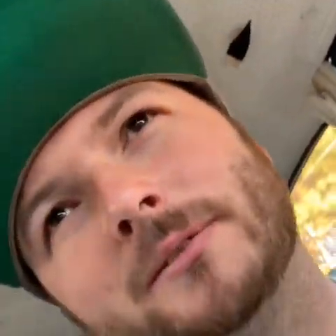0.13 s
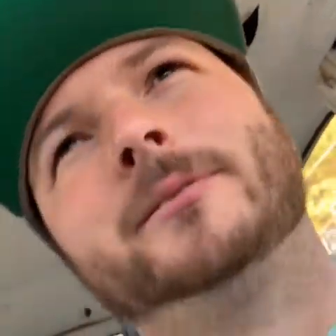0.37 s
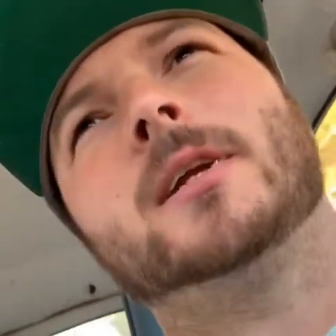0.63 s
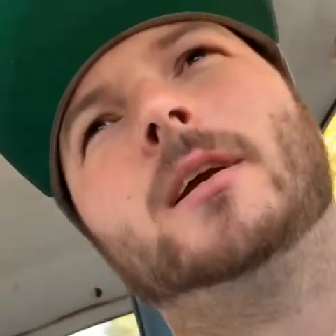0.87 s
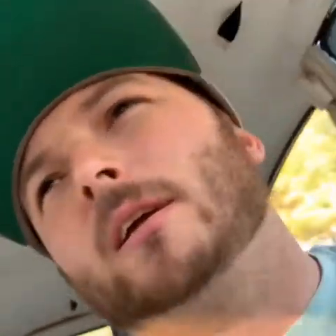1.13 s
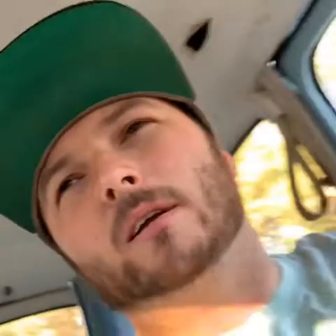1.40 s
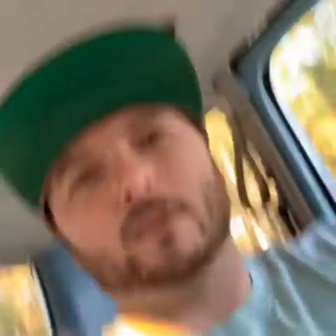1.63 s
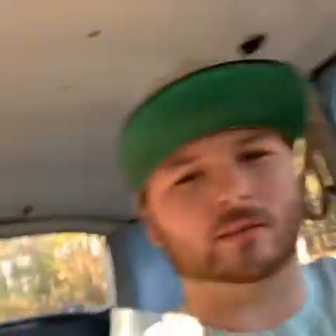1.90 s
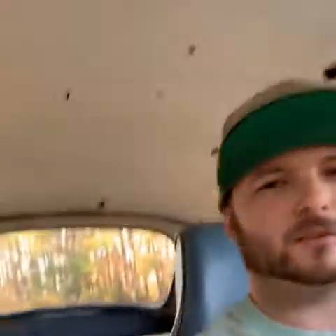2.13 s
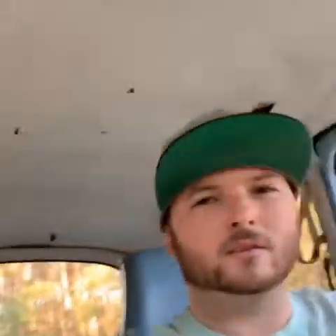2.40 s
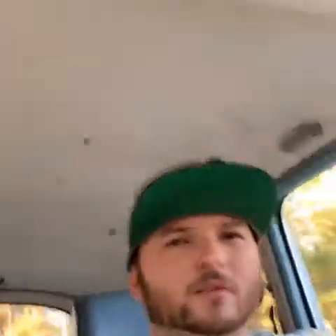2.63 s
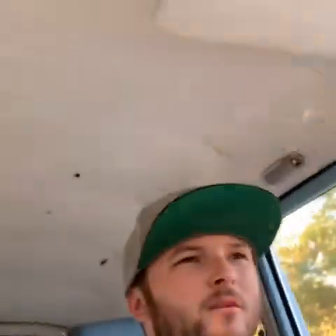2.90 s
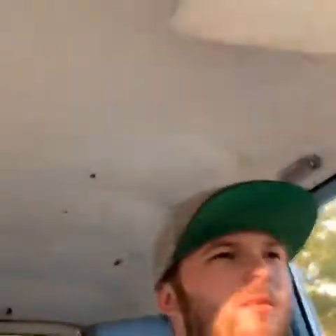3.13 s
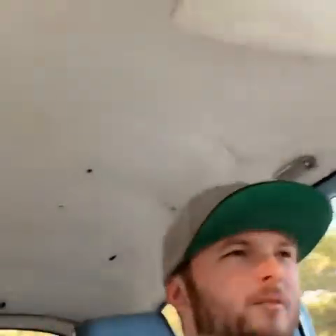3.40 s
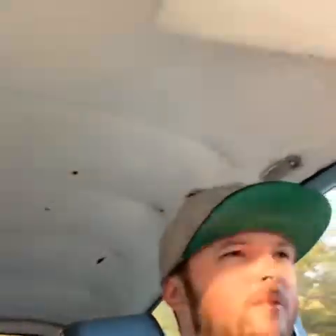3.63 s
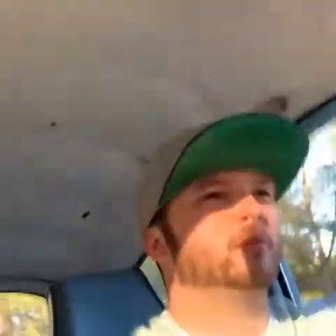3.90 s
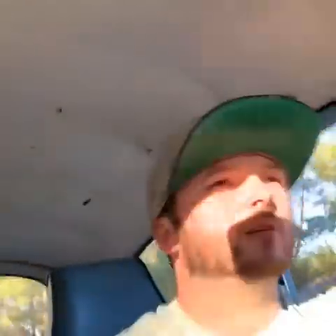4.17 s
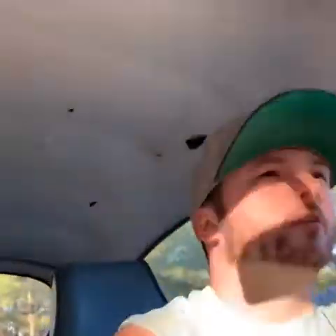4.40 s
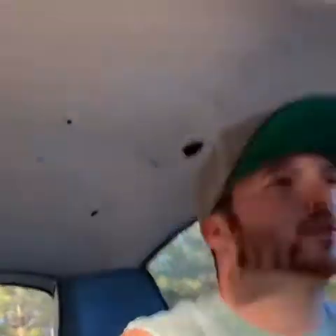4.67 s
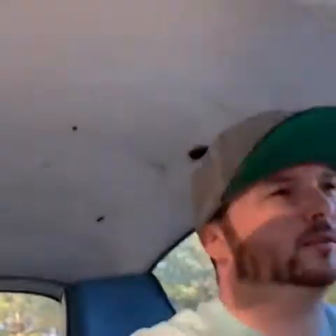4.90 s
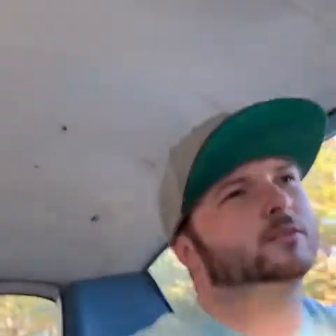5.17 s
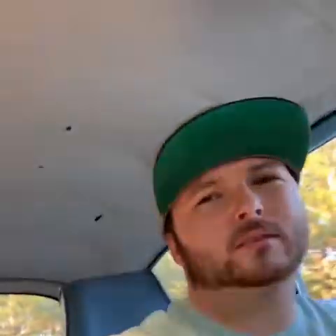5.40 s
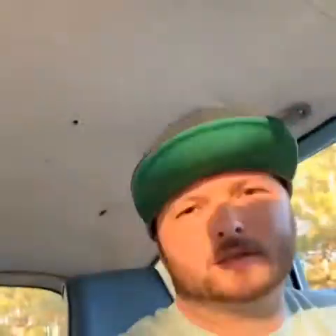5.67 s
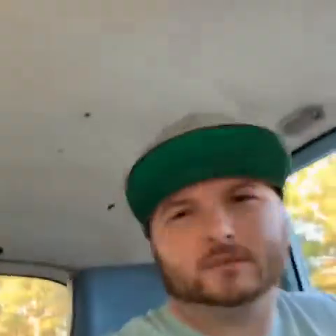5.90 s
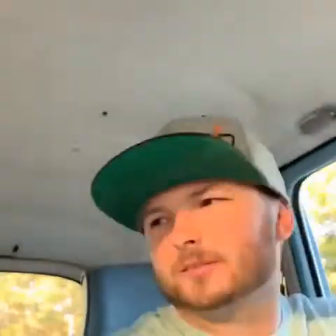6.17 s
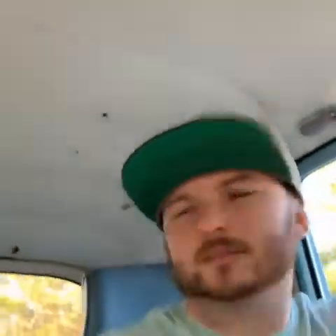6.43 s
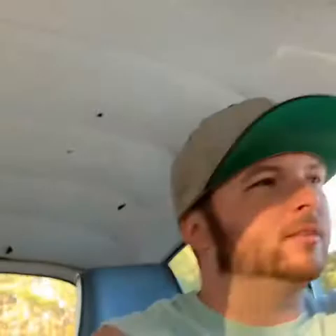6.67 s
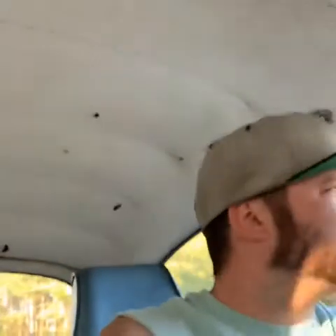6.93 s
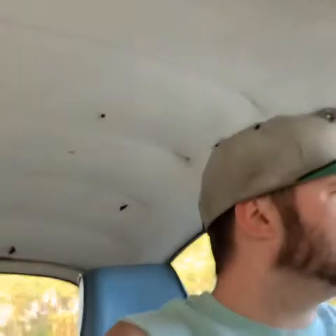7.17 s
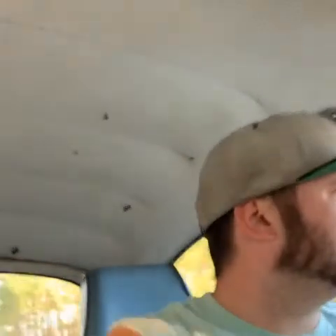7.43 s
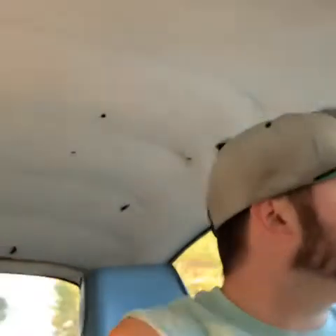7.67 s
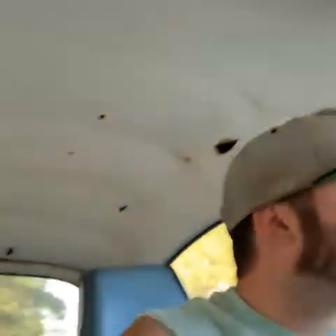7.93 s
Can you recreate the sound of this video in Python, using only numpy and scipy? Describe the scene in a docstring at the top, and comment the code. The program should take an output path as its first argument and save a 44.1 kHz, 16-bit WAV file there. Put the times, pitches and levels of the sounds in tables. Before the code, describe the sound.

A handheld phone in a car cabin picks up a low, rough engine drone sliding slowly downward, with road rumble, fan rush and soft hiss. Occasional weak knocks come first. As the phone swings away from the body the drone opens up, and a loose hard part clatters in irregular quick knocks, joined by dull floor bumps, bright clicks and brief cloth-like scuffs. The knocks fade before the end while the engine continues.

```python
"""Inside a small car on the move, a hand-held phone hears an air-cooled four-cylinder engine slow gently.
Engine orders, sines locked to the cycle, boom through cabin resonances; filtered noise gives the road
rumble, body drone, fan rush and hiss. Rough firing puffs, whines slide down and panels hum.
A loose part rings its modes as it knocks, the floor thuds, trim ticks in short damped rings, and
short noise bursts give cloth and seat scuffs, hisses and the bright noise of some knocks and ticks."""
import sys
import numpy as np
from scipy import signal
from scipy.fft import rfft, irfft, next_fast_len
from scipy.io import wavfile
from scipy.ndimage import uniform_filter1d

SR = 44100
rng = np.random.default_rng(int(sys.argv[2]) if len(sys.argv) > 2 else 0)


def voltage_ratio(decibels):
    """Convert decibels (scalar or array-like) to amplitude ratios, 20 dB per decade."""
    exponent = np.asarray(decibels, float) / 20
    return 10 ** exponent


def waveform_to_disk(signal):
    """Save audio, clipped to [-1, 1], as 16-bit WAV at the path in sys.argv[1]."""
    frames = np.transpose(np.atleast_2d(signal))
    scaled = np.clip(frames, -1, 1) * 32767
    samples = np.round(scaled).astype(np.int16)
    wavfile.write(sys.argv[1], SR, samples)


N = 355225
T = np.arange(N) / SR
SIDES = np.array([[1], [-1]])  # left, right

# engine speed: time_s, rate_hz (four-stroke cycles per second)
ENGINE_SPEED = [(0, 17.35), (.5, 17.31), (1, 17.18), (2, 16.66), (3, 16.25), (4, 15.98), (5, 15.75),
                (6.5, 14.79), (7, 14.66), (8.05, 14.14)]
# relative strength of the engine orders: order (multiple of the cycle rate), level_db
ORDER_LEVELS = [(2, -1.5), (3, -5.4), (4, 12.5), (5, 8.7), (6, 3.0), (7, -1.0), (8, 4.7), (9, -7.0),
                (10, 1.6), (11, -8.5), (12, 0.4), (13, -6.4), (14, -7.0), (15, -6.5), (16, -1.5),
                (17, -4.0), (18, 5.0), (19, -5.0), (20, 4.2), (21, 3.3), (22, 1.6), (23, -2.3), (24, 1.7),
                (25, 4.5), (26, 2.6), (27, -1.2), (28, 2.8), (29, 4.0), (30, 1.0)]
# cabin resonances through which the orders slide: frequency_hz, level_db
CABIN_BOOM = [(28.0, -42.0), (32.0, -38.9), (35.0, -23.5), (50.0, -28.0), (60.0, -36.5), (65.0, -31.4),
              (71.0, -31.5), (79.0, -24.8), (85.0, -35.0), (100.0, -30.8), (114.0, -31.2), (125.0, -32.5),
              (142.0, -19.2), (150.0, -25.0), (158.0, -35.5), (170.0, -25.8), (185.0, -28.0),
              (200.0, -25.6), (226.0, -35.0), (243.0, -33.0), (256.0, -43.0), (273.0, -29.8),
              (292.0, -43.5), (330.0, -43.1), (400.0, -49.1), (520.0, -54.6)]
# change to the engine before the phone moves: frequency_hz, gain_db
ENGINE_SHELTER = [(150, -2.2), (200, -10), (520, -14)]
# change to the cabin noise before the phone moves: frequency_hz, gain_db
BODY_SHADOW = [(60, 0), (100, -3), (200, -3), (350, 0)]
# likeness of the two channels: frequency_hz, correlation (0 to 1)
CHANNEL_LIKENESS = [(40, 0.96), (150, .98), (290, 0.91), (600, 0.065), (1400, 0.23), (5000, 0.19),
                    (15000, 0.39)]
# balance of the two channels: frequency_hz, left_minus_right_db
CHANNEL_BALANCE = [(30, 9), (70, -3.5), (130, 0.5), (300, -1), (600, -0.5), (15000, 0)]
# centres of rumble, drone, rush and hiss: frequency_hz
LAYER_CENTRES = (110, 370, 1300, 6000)
# spectrum of the cabin noise: frequency_hz, density_db (relative, per Hz)
NOISE_SPECTRUM = [(15, -43), (22, -29), (54, -5), (80, -2), (100, -8), (130, -14), (187, -14.5), (234, -18),
                  (300, -19), (450, -24.5), (640, -30), (800, -29.5), (1500, -39), (2200, -44),
                  (3500, -46.5), (5500, -54), (9000, -59)]
# further fall of the treble: frequency_hz, gain_db
TREBLE_ROLLOFF = [(9000, 0), (14000, -3), (14500, -6), (14900, -16), (15600, -26)]
# road rumble, of which only the swing about the mean counts: time_s, level_db
RUMBLE_SWING = [(0.0, -22.5), (0.38, -20), (0.62, -19), (0.92, -23), (1.5, -25), (2.06, -23), (2.53, -23.5),
                (2.89, -23.5), (3.11, -21), (3.6, -23.5), (5.09, -24.5), (5.47, -25), (6.08, -19),
                (6.34, -17.5), (6.9, -23), (7.22, -17.5), (7.6, -24.5), (8.05, -24)]
# drone, rush, hiss; the drone's mean sets the level of all: start_db, move_gain_db, drift_db_per_s
NOISE_LEVELS = [(-33, 4.5, 0.4), (-38, 3, 0.12), (-50.3, 1.8, 0.43)]
# high engine orders: order, waver_hz, level_db, start_s, end_s
WHINE_ORDERS = [(37.8, 14, -46, -1, 1.5), (50.2, 14, -47, 4.7, 6.1), (51, 16, -46, 6.8, 9),
                (47.6, 12, -47, 5.4, 6.9), (34.1, 10, -44, 3.7, 5.5), (25, 9, -40, 5.9, 7.9)]
# resonant panels: pitch_hz, width_hz, level_db, start_s, end_s
PANEL_HUMS = [(660, 39, -43, -1, 1.72), (410, 58, -37, -0.5, 1.67), (1394, 130, -45.5, -1.5, 9),
              (768, 16, -47, -8, 1.8), (439, 18, -35, 6, 6.73)]
# blows of the loose part: start_s, level_db
KNOCK_BLOWS = [(0.042, -24.5), (0.185, -33), (0.312, -23.5), (0.37, -29), (0.803, -24.5), (1.101, -23.5),
               (1.199, -25), (1.417, -28), (1.505, -23.5), (1.969, -31), (2.267, -25), (2.407, -15),
               (2.659, -10.5), (2.806, -10.5), (2.95, -15.5), (3.146, -18.5), (3.3, -8), (3.453, -13),
               (3.585, -16), (3.825, -20.5), (3.85, -24), (3.947, -19), (4.078, -13.5), (4.246, -13.5),
               (4.431, -18.5), (4.556, -15.5), (4.746, -17), (4.894, -11), (5.014, -11.5), (5.243, -13.5),
               (5.335, -14), (5.446, -16), (5.618, -19), (5.753, -15), (5.832, -25), (6.339, -15.5),
               (6.423, -27), (6.558, -15.5), (6.693, -21), (6.983, -12), (7.089, -19.5), (7.369, -33),
               (7.617, -28)]
# modes of the loose part: pitch_hz, level_db (relative), t60_s
LOOSE_PART_MODES = [(703, -11.5, 0.39), (807.4, -3, 0.23), (880, 1.5, 0.11), (931, 7, 0.071),
                    (970, -10, 0.11), (1079, -1.5, 0.14), (1400, -6.5, 0.11), (1570, -9, .05),
                    (1662, -2.5, 0.14), (1870, -9.5, 0.062), (2092, -6, 0.11), (2300, -18, 0.07),
                    (2580, -7, 0.062), (2740, -12, 0.063), (3060, -23, 0.035), (3270, -30, 0.05)]
# road bumps through the floor: start_s, level_db, pitch_hz, t60_s
FLOOR_BUMPS = [(0.863, -9.5, 125, 0.21), (3.58, -12.5, 141, 0.086), (6.455, -11.5, 150, 0.12),
               (7.678, -10, 101, 0.15), (7.699, -15, 163, 0.1), (3.692, -15, 320, .1),
               (4.135, -17.5, 370, .09), (4.195, -15.5, 170, .09), (4.265, -18, 290, .08),
               (6.185, -15.5, 330, .1), (5.91, -17.5, 275, .14)]
# short bright clicks: start_s, level_db, pitch_hz, t60_s, left_minus_right_db
SHORT_CLICKS = [(2.6454, -30, 8700, 0.0048, -10), (3.332, -10.5, 6440, 0.0017, 10),
                (3.9, -22, 2400, 0.0033, 2), (1.401, -32, 2980, 0.004, 2), (3.3315, -18, 12800, 0.0041, 7),
                (3.6665, -14.5, 8500, 0.0079, -22), (3.667, -20, 3600, 0.0037, -3),
                (3.6669, -18, 2300, 0.0034, -2), (4.2, -26, 5900, .004, -1), (2.904, -23, 3500, 0.0046, 1),
                (3.85, -28, 4800, 0.0042, -3), (6.099, -35, 9800, .005, .1)]
# short noise bursts (scuffs, hisses and the bright noise of some knocks and ticks):
# start_s, length_s, centre_hz, width_hz, level_db, left_minus_right_db
NOISE_BURSTS = [(2.296, 0.05, 4770, 6100, -35, 2), (2.304, 0.04, 3170, 1800, -45, -23),
                (3.666, 0.017, 3300, 1194, -36.5, 6), (2.51, 0.1, 8700, 880, -52.5, -16),
                (3.295, 0.065, 6900, 7000, -43, -5), (5.594, 0.18, 4230, 1500, -45, 1),
                (5.648, 0.079, 4650, 350, -40.5, -7), (5.608, 0.14, 10600, 2000, -49.5, .1),
                (6.177, 0.051, 4500, 600, -41, 2), (6.46, 0.15, 12000, 4000, -51, 0),
                (6.608, 0.079, 13100, 3500, -45, 1), (7.763, 0.064, 2940, 1400, -36.5, 4)]

# the phone is moved out from close to the body into the open cabin
MOVE_START_S, MOVE_END_S = 1.13, 2.73
LEFT_LEAD_S = 0.000484  # lead of the left channel in cabin treble and noise bursts


def columns(table):
    """Linear interpolation in time of each table column."""
    s, *rest = np.transpose(table)
    return [np.interp(T, s, column) for column in rest]


def on_log(hz, table):
    """Linear interpolation on a logarithmic frequency axis."""
    f, value = np.transpose(table)
    return np.interp(np.log(hz), np.log(f), value)


def unit(x):
    """Normalisation to an rms of 1."""
    return x / np.sqrt(np.mean(x ** 2))


def walk(rate):
    """Smoothed random fluctuation: levels held 1 / rate s, averaged twice, rms 1."""
    k = int(SR / rate)
    held = np.repeat(rng.standard_normal(N // k + 1), k)
    smooth = uniform_filter1d(uniform_filter1d(held, k), k)
    return unit(smooth[:N])


def fade(start, end):
    """Linear amplitude envelope: rises after start and falls before end, each in 0.27 s."""
    return np.clip(np.minimum(T - start, end - T) / 0.27, 0, 1)


def add(out, s, sound, pan_db, lead_s=0.):
    """Superposition with level and time differences: the right channel is lead_s later."""
    for ch, side in enumerate((1, -1)):
        i = int((s + ch * lead_s) * SR)
        out[ch, i:i + len(sound)] += voltage_ratio(side * pan_db / 2) * sound[:N - i]


def engine(cycle, hz, moved):
    """Harmonic synthesis: orders excite cabin resonances; uneven firing wavers their level and phase."""
    engine_gain_db = 1.3
    # at first the orders keep in step and one firing throbs out;
    # once the phone moves, cabin paths scatter them a little more
    scatter = .18 + .1 * moved  # turns
    out = np.zeros((2, N))
    for k, order_db in ORDER_LEVELS:
        db = engine_gain_db + order_db + on_log(k * hz, CABIN_BOOM)
        db = db + (1 - moved) * on_log(k * hz, ENGINE_SHELTER)
        turns = k * (cycle + .32) + scatter * rng.uniform(-1, 1)
        angle = 2 * np.pi * turns + .15 * walk(4)
        mean_hz = k * hz.mean()
        # the two ports sit at slightly different places in the cabin's standing waves
        skew = np.arccos(np.clip(on_log(mean_hz, CHANNEL_LIKENESS), 0, 1)) * 0.6 * SIDES
        waver_db = (.9 + mean_hz / 300 + k % 2) * walk(4)  # odd orders waver more
        balance_db = on_log(mean_hz, CHANNEL_BALANCE) / 2 * SIDES
        out += np.sqrt(2) * voltage_ratio(db + waver_db + balance_db) * np.cos(angle + skew)
    return out


def cabin(cycle, moved):
    """Filtered noise with band-wise modulation: half-octave bands flicker and throb once a cycle."""
    size = next_fast_len(N)
    hz = np.maximum(np.arange(size // 2 + 1) * SR / size, 1)
    # mid and side noise mixed to the wanted correlation
    like = np.clip(on_log(hz, CHANNEL_LIKENESS), 0, 1)
    mid, side = rfft(rng.standard_normal((2, size)))
    pair = np.sqrt(1 + like) * mid + np.sqrt(1 - like) * side * SIDES
    colour_db = on_log(hz, NOISE_SPECTRUM) + on_log(hz, TREBLE_ROLLOFF)
    balance_db = on_log(hz, CHANNEL_BALANCE) / 2 * SIDES
    pair = pair * voltage_ratio(colour_db + balance_db) * (hz > 15)
    # the treble comes from the left, and close-packed cabin modes ripple its spectrum
    lag_s = LEFT_LEAD_S * np.clip((hz - 500) / 1500, 0, 1)
    pair[1] *= np.exp(-2j * np.pi * hz * lag_s)
    ripple = rng.standard_normal(SR // 60)
    ripple_db = 2.1 * np.interp(hz / 35, np.arange(len(ripple)), ripple)
    pair *= voltage_ratio(ripple_db * (hz > 1200))

    upper_db = [db + gain_db * moved + drift * T for db, gain_db, drift in NOISE_LEVELS]
    levels_db = np.array(columns(RUMBLE_SWING) + upper_db)
    swing_db = levels_db - levels_db.mean(axis=1, keepdims=True)
    throb = np.cos(2 * np.pi * (cycle + 0.32 * walk(9.7)))
    throb_depth = [(150, .01), (400, 1.2), (1500, 0.74), (8000, 1.46)]  # frequency_hz, depth_db
    shared = walk(9)
    layers = np.zeros((4, 2, N))
    for centre in 22.1 * 2 ** np.arange(0, 10, .5):
        # each band blends the swings of the two nearest layers
        place = np.interp(np.log(centre), np.log(LAYER_CENTRES), np.arange(4))
        low = min(int(place), 2)
        db = swing_db[low] + (place - low) * (swing_db[low + 1] - swing_db[low])
        db = db * (.3 if centre < 55 else 1)  # the deepest bands hardly swing
        db = db + (1 - moved) * on_log(centre, BODY_SHADOW)
        db = db + on_log(centre, throb_depth) * throb
        db = db + 2.4 * (centre < 500) * walk(2.956) + 0.86 * walk(13)
        db = db + 0.47 * (centre > 500) * shared
        band = np.clip(1 - 2 * np.abs(np.log2(hz / centre)), 0, 1)
        layers[round(place)] += voltage_ratio(db) * irfft(pair * band, size)[:, :N]
    drone = layers[1].mean(axis=0)
    return layers.sum(axis=0) * voltage_ratio(levels_db[1].mean()) / np.sqrt(np.mean(drone ** 2))


def thumps(cycle, moved):
    """Periodic impulsive excitation: one rough firing a cycle shakes the body, each of its own strength."""
    spread_db, t60_s, lead_cycles = 4.0, .08, .2
    place = cycle + lead_cycles
    turn = place.astype(int)
    size_db = spread_db * rng.standard_normal(200)[turn]
    since_s = (place - turn) / 16  # timed for 16 cycles per second
    mid, side = rng.standard_normal((2, N))
    envelope = 1000. ** (-since_s / t60_s) * (1 - np.exp(-since_s / 0.0074))
    puff = (mid + 0.64 * side * SIDES) * voltage_ratio(size_db) * envelope
    band = signal.butter(3, [200, 500], "band", fs=SR, output="sos")
    return voltage_ratio(-44.95 + 10.3 * moved) * unit(signal.sosfilt(band, puff))


def whines(cycle):
    """Order tracking: faint high orders slide with the engine and waver in level and phase."""
    out = np.zeros((2, N))
    for order, waver_hz, db, start, end in WHINE_ORDERS:
        angle = 2 * np.pi * order * cycle + .8 * walk(waver_hz) + .5 * SIDES
        level = voltage_ratio(db + 3.9 * walk(waver_hz))
        out += np.sqrt(2) * level * np.cos(angle) * fade(start, end)
    return out


def panels(cycle):
    """Resonance under noise: each panel hums within its own span of time, kicked once a cycle."""
    out = np.zeros((2, N))
    kick = voltage_ratio(2.0 * np.cos(2 * np.pi * (cycle + 0.51)))
    for hz, width_hz, db, start, end in PANEL_HUMS:
        resonance = signal.iirpeak(hz, hz / width_hz, fs=SR)
        hum = signal.lfilter(*resonance, rng.standard_normal((2, N)))
        out += voltage_ratio(db) * unit(hum) * kick * voltage_ratio(2.0 * walk(12)) * fade(start, end)
    return out


def knocks():
    """Modal synthesis: each blow rings the same modes anew, with a bright crack and a grainy clatter."""
    crack_db, crack_t60_s = 3, .035  # crack level is against the clatter
    pan_db, lead_s = 2, .0002  # left louder and earlier
    out, t = np.zeros((2, N)), T[:SR // 5]
    hz, db, t60 = np.transpose(LOOSE_PART_MODES)[:, :, None]
    clatter_band = signal.butter(2, [750, 2900], "band", fs=SR, output="sos")
    soft = signal.butter(2, 4200, fs=SR, output="sos")
    clatter_decay = 1000. ** (-t / 0.22) + voltage_ratio(crack_db) * 1000. ** (-t / crack_t60_s)
    for s, level_db in KNOCK_BLOWS:
        strength, detune, path = rng.standard_normal((3, len(LOOSE_PART_MODES), 1))
        modes = voltage_ratio(db + 1.3 * strength) * 1000. ** (-t / t60) * (1 - np.exp(-t / 0.00035))
        angle = 2 * np.pi * hz * (1 + 0.0025 * detune) * t
        # upper modes reach the two ports by different paths
        ring = np.array([(modes * np.sin(angle + side * path * hz / 2500)).sum(axis=0)
                         for side in (.5, -.5)])
        # the grain level changes every 90 samples
        grain = np.repeat(rng.standard_normal((2, len(t) // 90 + 1)), 90, axis=1)[:, :len(t)]
        grains = rng.standard_normal((2, len(t))) * voltage_ratio(0.77 * grain)
        clatter = signal.sosfilt(clatter_band, grains * clatter_decay)
        blow = signal.sosfilt(soft, ring / np.abs(ring).max() + voltage_ratio(-10) * clatter)
        for ch in range(2):
            i = int((s + ch * lead_s) * SR)
            out[ch, i:i + len(t)] += voltage_ratio(level_db + SIDES[ch, 0] * pan_db / 2) * blow[ch]
    return out


def bumps():
    """Damped resonance: the floor pan thuds and dies fast, with a rough burst above the thud."""
    out, t = np.zeros((2, N)), T[:SR // 4]
    band = signal.butter(3, [180, 450], "band", fs=SR, output="sos")
    for s, db, hz, t60 in FLOOR_BUMPS:
        burst = unit(signal.sosfilt(band, rng.standard_normal(len(t))))
        thud = np.sin(2 * np.pi * hz * t) + voltage_ratio(-8) * burst
        envelope = (1 - np.exp(-t / 0.0046)) * 1000. ** (-t / t60)
        add(out, s, voltage_ratio(db) * thud * envelope, -1.5)
    return out


def clicks():
    """Impact response: a tiny hard contact is one or a few short damped rings."""
    out, t = np.zeros((2, N)), T[:SR // 30]
    for s, db, hz, t60, pan_db in SHORT_CLICKS:
        envelope = (1 - np.exp(-t / 0.000097)) * 1000. ** (-t / t60)
        add(out, s, voltage_ratio(db) * np.sin(2 * np.pi * hz * t) * envelope, pan_db)
    return out


def noise_bursts():
    """Band-limited noise under an envelope: short grainy bursts start fast and die away."""
    out = np.zeros((2, N))
    for s, length, hz, width_hz, db, pan_db in NOISE_BURSTS:
        u = np.arange(int(length * SR)) / (length * SR)  # 0 to 1 through the burst
        grains = rng.standard_normal(SR // 5) * voltage_ratio(4.2 * rng.standard_normal(SR // 5))
        edges = [max(hz - width_hz / 2, 500), min(hz + width_hz / 2, 16000)]
        band = signal.butter(2, edges, "band", fs=SR, output="sos")
        burst = unit(signal.sosfilt(band, grains))[:len(u)]
        envelope = np.minimum(u / 0.11, 1) * (1 - u ** 1.4) * np.sqrt(2)
        add(out, s, voltage_ratio(db) * burst * envelope, pan_db, LEFT_LEAD_S)
    return out


def scene():
    """Superposition of engine, cabin noise and the small sounds, the engine sounds on one shared cycle."""
    hz, = columns(ENGINE_SPEED)
    cycle = np.cumsum(hz) / SR
    moved = np.interp(T, [MOVE_START_S, MOVE_END_S], [0, 1])
    running = engine(cycle, hz, moved) + cabin(cycle, moved) + thumps(cycle, moved)
    running = running + whines(cycle) + panels(cycle)
    return running + knocks() + bumps() + clicks() + noise_bursts()


def low_pass(x):
    """Removes everything above the highest recorded frequency."""
    return signal.sosfilt(signal.butter(12, 15620, fs=SR, output="sos"), x)


def record(dry):
    """Soft saturation: the phone rounds the loudest peaks towards a ceiling."""
    ceiling, knee_order = 1.05, 4
    loud = 1.012 * dry
    rounded = loud / (1 + (loud / ceiling) ** knee_order) ** (1 / knee_order)
    return low_pass(rounded)


dry = scene()
out = record(dry)
waveform_to_disk(out)
```